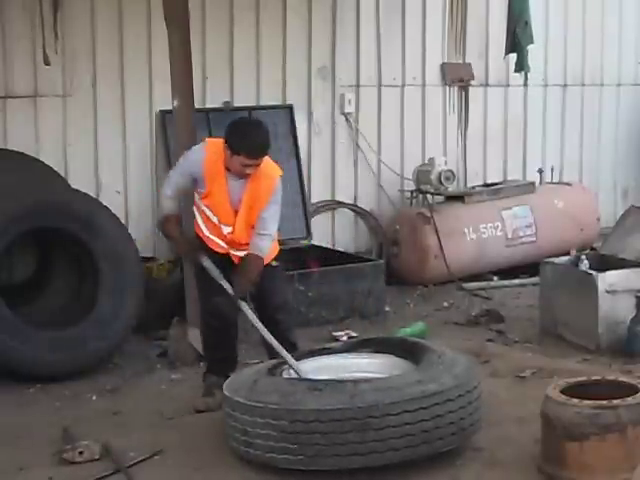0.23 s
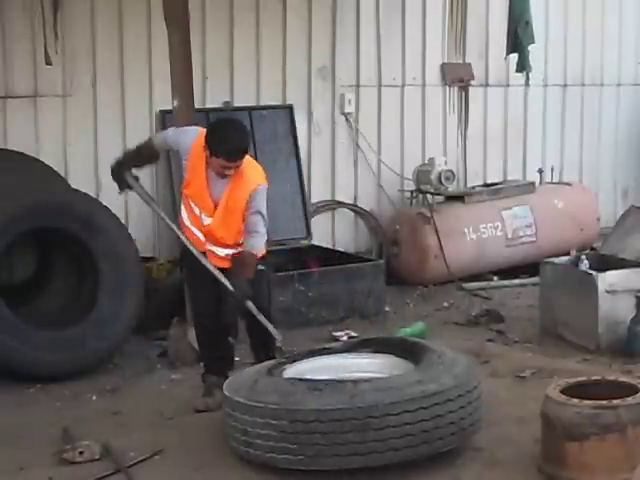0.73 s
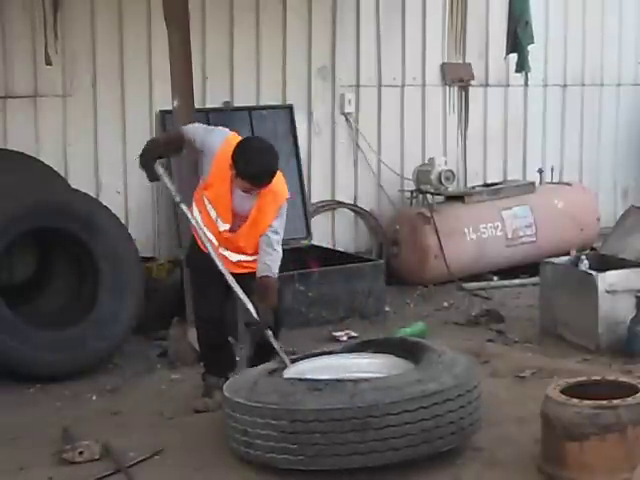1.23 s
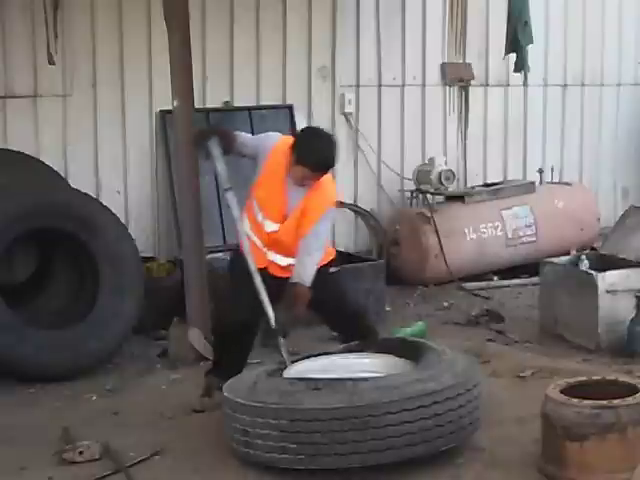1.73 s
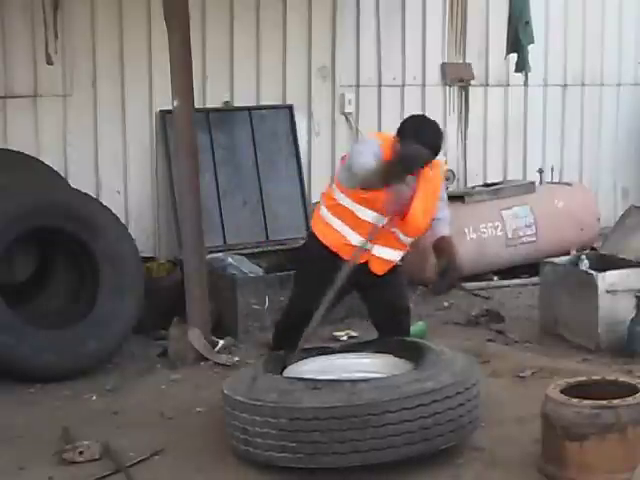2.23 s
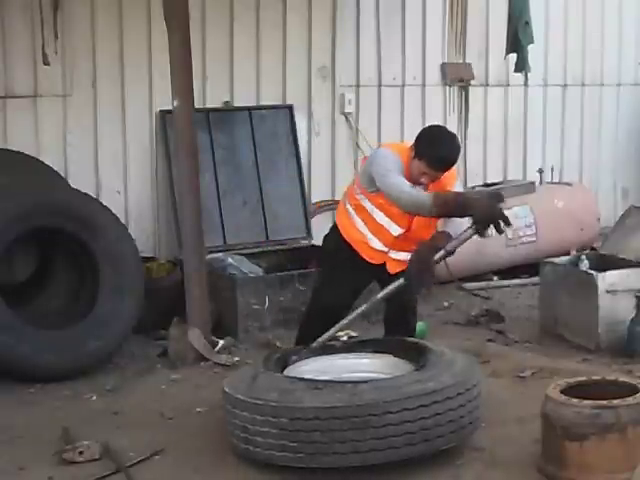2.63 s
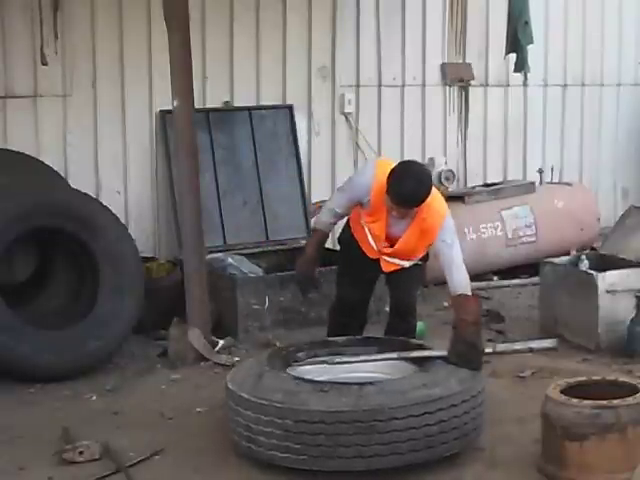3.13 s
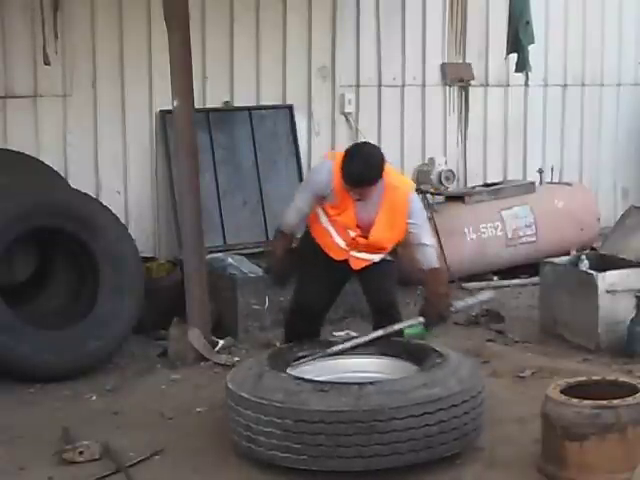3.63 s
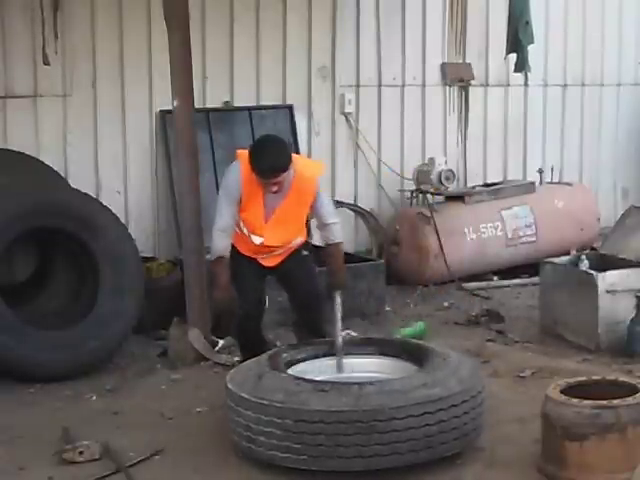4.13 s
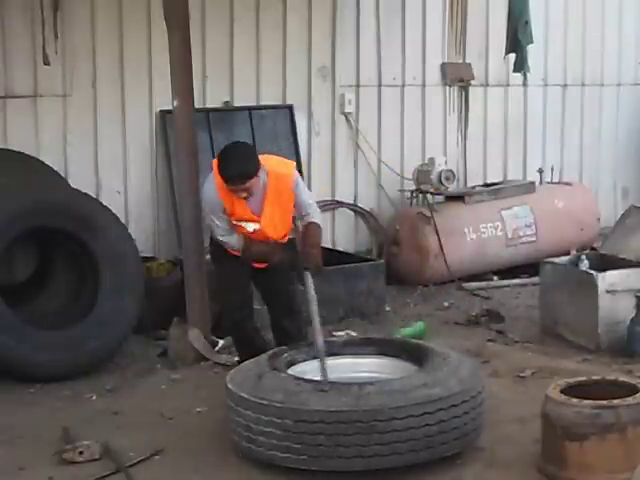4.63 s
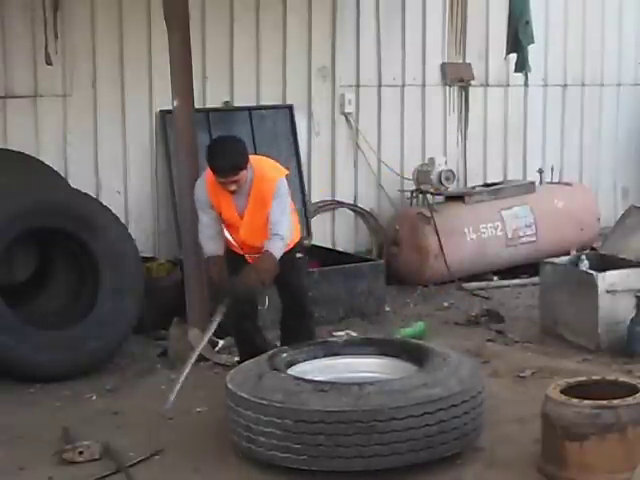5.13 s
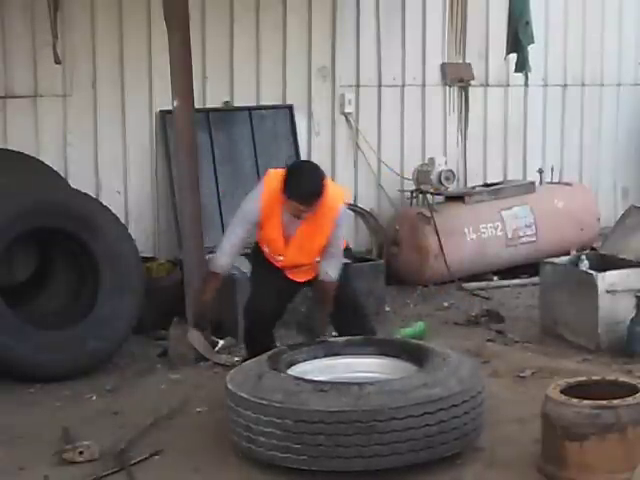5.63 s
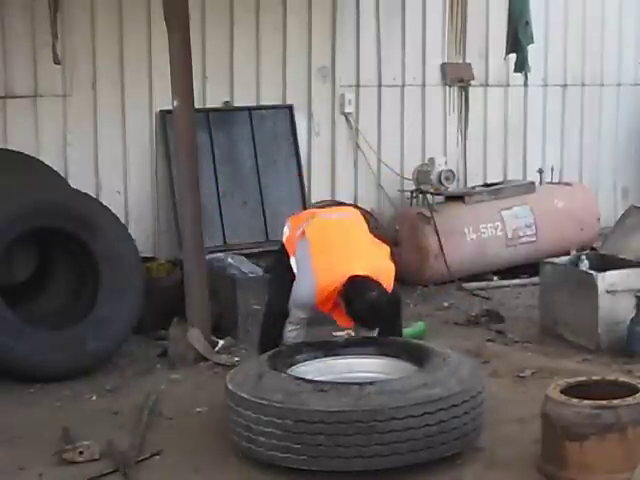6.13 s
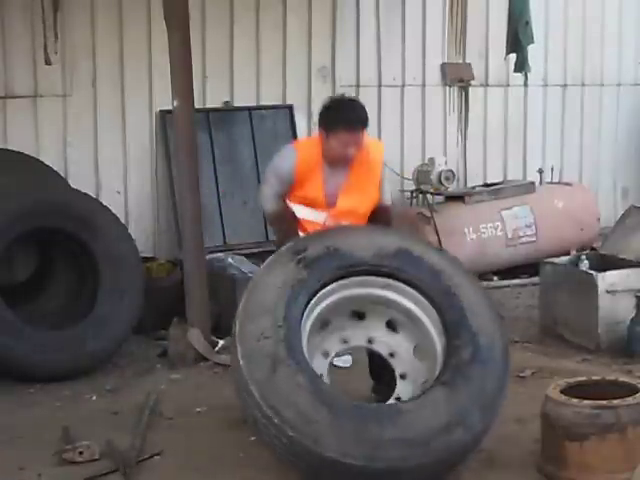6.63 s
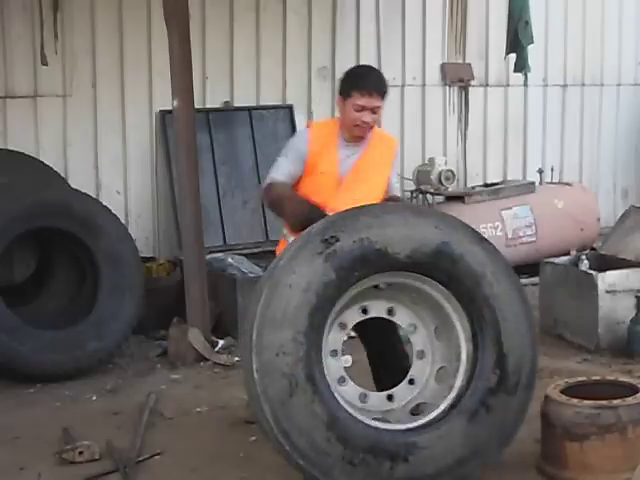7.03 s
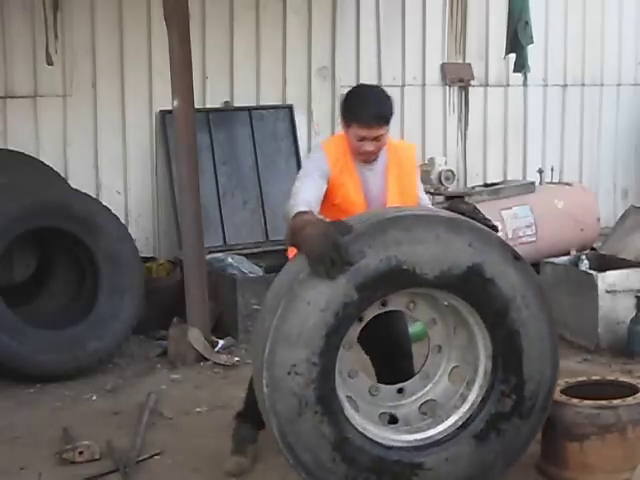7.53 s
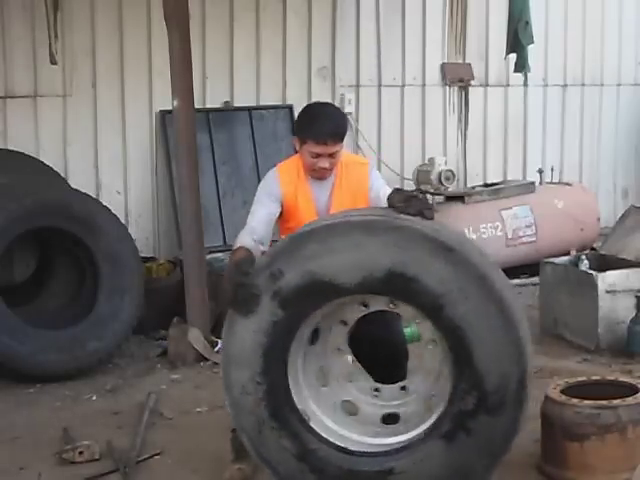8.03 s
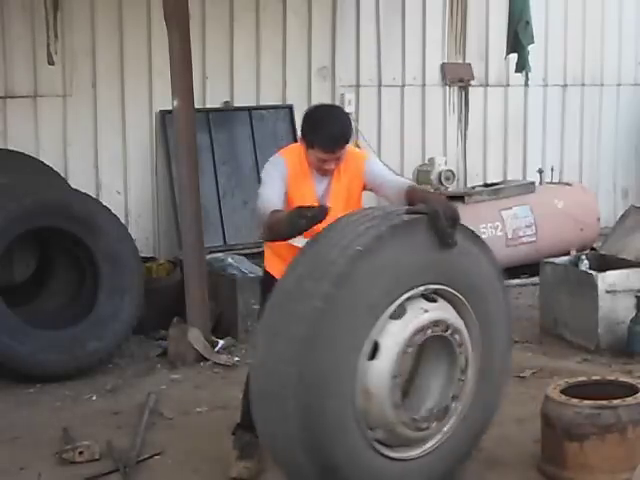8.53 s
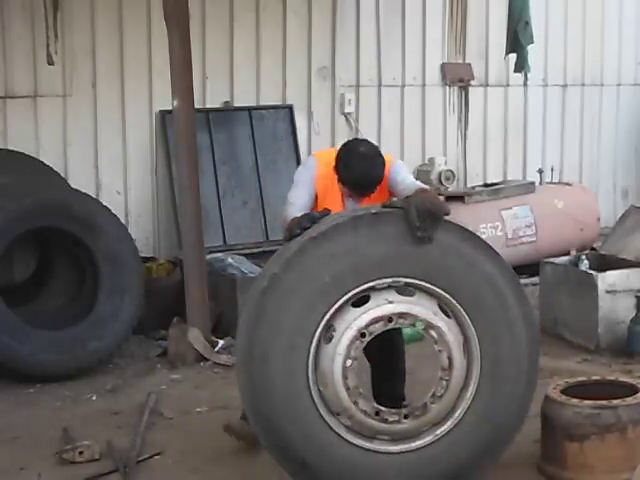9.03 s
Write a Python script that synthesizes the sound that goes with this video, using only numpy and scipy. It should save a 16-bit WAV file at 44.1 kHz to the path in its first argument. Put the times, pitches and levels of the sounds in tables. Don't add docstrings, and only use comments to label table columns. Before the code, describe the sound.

A steady low engine drone near 200 Hz, gently swelling, sits over soft road rumble throughout. At the very start an already ringing bar fades, then a bright clank strikes the rim at 0.07 s, followed by duller sliding knocks from 0.3 to 0.5 s. At 0.95 s a hard clang drives into the tyre with a deep hollow boom. Small ticks come at 1.45 and 1.65 s, a thump with clank at 2.9 s, and a lighter one at 3.9 s. From 5.1 s the thrown bar hits hard dirt, rattling rapidly and ringing; it lands loudest at 5.6 s, rebounds at 5.8 s and settles by 6.1 s. Only drone follows until rubber scuffs grit from 7.75 s, with a light ping at 7.9 s, roughest near 8.4 and 8.6 s, fading by 9 s. The nearby cheap microphone is dull and overloads on peaks.

```python
import sys
import numpy as np
from scipy import signal
from scipy.fft import rfft, irfft
from scipy.io import wavfile
from scipy.ndimage import uniform_filter1d

SR = 44100
rng = np.random.default_rng(int(sys.argv[2]) if len(sys.argv) > 2 else 0)


def magnitude_from_level(level_db):
    exponent = np.asarray(level_db, float) / 20
    return 10 ** exponent


def generate_wav(signal):
    frames = np.transpose(np.atleast_2d(signal))
    scaled = np.clip(frames, -1, 1) * 32767
    pcm = np.round(scaled).astype(np.int16)
    wavfile.write(sys.argv[1], SR, pcm)


N = 408807
T = np.arange(N) / SR


def curve(table):
    s, *columns = np.transpose(table)
    return [np.interp(T, s, column) for column in columns]


def coloured(spectrum):
    hz, db = np.transpose(spectrum)
    f = np.fft.rfftfreq(N, 1 / SR) + 1
    gain = magnitude_from_level(np.interp(np.log(f), np.log(hz), db))
    y = irfft(rfft(rng.standard_normal(N)) * gain, N)
    return y / y.std()


def walk(rate):
    k = int(SR / rate)
    levels = np.repeat(rng.standard_normal(N // k + 1), k)
    y = uniform_filter1d(uniform_filter1d(levels, k), k)[:N]
    return y / y.std()


def fade(t, t60):
    return np.exp(-np.log(1000) * t / np.maximum(t60, .01))


def gate(t, attack=.0008, release=.004):
    return (1 - np.exp(-(t - t[0]) / attack)) * (1 - np.exp((t - t[-1]) / release))


def add(out, s, sound):
    i = int(s * SR)
    out[i:i + len(sound)] += sound[:len(out) - i]


def bursts(events, rise_s):
    power = np.zeros((2, N))
    for s, db, held, t60, other_db in events:
        i = int(s * SR)
        t = T[:min(N - i, SR)]
        rise = 1 - np.exp(-t / max(rise_s, 1 / SR))
        shape = rise * fade(np.maximum(t - held, 0), t60)
        power[:, i:i + len(t)] += (magnitude_from_level(np.array([[db], [db + other_db]])) * shape) ** 2
    return np.sqrt(power)


def small_modes(noise, width_hz=30, depth_db=4.5):
    spec = rfft(noise)
    k = int(width_hz * N / SR)
    comb = uniform_filter1d(np.repeat(rng.standard_normal(len(spec) // k + 1), k), k)[:len(spec)]
    y = irfft(spec * magnitude_from_level(depth_db * comb / comb.std()), N)
    return y / y.std()


# pitch in Hz, level in dB.
CLATTER = [(820, -35), (1400, -8), (1820, -3.5), (2320, -6), (3290, -1), (3800, -11.5), (4960, -16.5),
           (5900, -29), (7670, -64), (13000, -120)]


def bright_clatter(chatter):
    return small_modes(coloured(CLATTER)) * chatter


# pitch in Hz, level in dB.
RIM_BODY = [(400, -28.5), (650, -0.5), (1050, 0), (1450, -3.5), (2100, -39)]
# start in seconds, clatter level in dB, seconds held, seconds to fade by 60 dB,
# level of the dull part in dB compared with the clatter.
KNOCKS = [(0, -17, 0.0017, 0.22, -6), (.071, -7.5, 0.02, 0.58, -2), (.314, -17, 0.01, 0.61, 6.5),
          (.326, -19, 0.013, 0.43, -0.5), (.365, -21, .02, 0.41, 8.5), (.409, -19.5, 0.008, 0.2, 4.5),
          (.445, -19.5, .006, 0.35, 7), (.949, -20, 0.013, 0.24, -13.5), (.972, -7, 0.013, 0.43, -10.5),
          (1.655, -19, 0.012, 0.37, -10.5), (2.954, -13, 0.0069, 0.25, -0.5),
          (3.936, -12.5, 0.0057, 0.2, -9.5), (5.144, -2, 0.021, 0.22, -3), (5.176, -10, .008, .15, -11),
          (5.195, -11, .004, 0.11, -8.5), (5.218, -7, .006, 0.14, -7.5), (5.238, -7.5, .004, 0.13, -5.5),
          (5.271, -8.5, 0.0049, 0.17, -10), (5.293, -9.5, 0.0045, .12, -6),
          (5.312, -12, 0.0066, 0.37, -6.5), (5.49, -25, .03, 0.27, -1), (5.614, 1.5, 0.054, 0.31, -6.5),
          (5.787, -20, .006, .2, -11.5), (5.795, -3, 0.026, 0.54, -11.5), (5.843, -5.5, 0.027, 0.25, -11.5),
          (5.91, -17.5, .01, 0.45, -7.5)]


def knocks():
    chatter = magnitude_from_level(1.85 * walk(120))
    bright_gain, dull_gain = magnitude_from_level(-7) * bursts(KNOCKS, rise_s=.0015)
    return bright_gain * bright_clatter(chatter) + dull_gain * coloured(RIM_BODY) * chatter


def ring(modes, start, end):
    t = T[int(start * SR):int((end + .004) * SR)]
    flicker_db, flicker_step_s = 2.5, .014
    steps = np.arange(t[0], t[-1] + flicker_step_s, flicker_step_s)
    out = 0
    for hz, *dbs in modes:
        db = np.interp(t, np.linspace(start, end, num=len(dbs)), dbs)
        db = db + flicker_db * np.interp(t, steps, rng.standard_normal(len(steps)))
        tone = np.sin(2 * np.pi * (hz * t + rng.random()))
        for size, spread_hz in [(.22, 50), (.18, 120)]:
            twin_hz = hz + spread_hz * (rng.random() - .5)
            tone = tone + size * np.sin(2 * np.pi * (twin_hz * t + rng.random()))
        out = out + magnitude_from_level(db) * tone
    attack = .004 if start else 1 / SR
    return np.sqrt(2) * gate(t, attack) * out


# pitch in Hz, then levels in dB at even steps from strike to end.
RING_LEFT_OVER = [(2713, -23, -26, -29), (3052, -15, -28, -29), (3391, -29, -35, -40),
                  (3725, -50, -46, -38), (4874, -47, -51, -68)]
RING_IN_BOWL = [(1152, -24, -17, -28, -40), (1340, -19, -25, -33, -39), (1658, -21, -31, -37, -42),
                (2175, -21, -33, -38, -45), (2482, -17, -40, -46, -57), (2643, -20, -36, -49, -46),
                (2837, -18, -35, -54, -56), (3047, -31, -21, -28, -51), (3381, -23, -33, -45, -54),
                (3505, -30, -35, -45, -47), (4107, -21, -44, -59, -59), (4380, -22, -46, -52, -60),
                (4786, -51, -40, -52, -52), (4893, -39, -43, -60, -65), (5250, -34, -50, -58, -64)]
RING_SLIDING = [(1077, -21, -33, -30), (1685, -12, -23, -33), (2175, -30, -24, -31), (2552, -23, -32, -54),
                (3042, -30, -27, -33), (3391, -29, -36, -33), (4237, -19, -47, -78), (4786, -38, -40, -47),
                (4888, -27, -37, -34)]
RING_BOWL_FLOOR = [(872, -14, -32, -32), (969, -8, -38, -35), (1055, -37, -29, -26), (1394, -25, -35, -32),
                   (1981, -21, -43, -40), (3042, -21, -42, -53)]
RING_IN_BEAD = [(861, -19, -27, -36, -40), (1330, -15, -32, -37, -39), (1464, -33, -31, -37, -36),
                (1567, -30, -28, -41, -45), (1879, -20, -32, -50, -53), (1960, -36, -33, -41, -41),
                (2379, -16, -25, -36, -62), (2670, -12, -27, -43, -44), (2740, -25, -28, -42, -56),
                (2821, -20, -24, -37, -44), (3359, -24, -38, -52, -61), (3478, -23, -37, -48, -65),
                (3876, -19, -38, -44, -63), (3962, -33, -41, -49, -46), (4560, -22, -42, -50, -60),
                (4990, -30, -42, -52, -60), (5276, -37, -39, -57, -62), (5490, -34, -43, -52, -60)]
RING_PRYING = [(2042, -33, -36, -52), (2355, -36, -36, -50), (2567, -29, -31, -38), (2659, -37, -36, -60),
               (3216, -29, -40, -46), (3386, -28, -42, -48)]
RING_ON_FLANGE = [(2705, -23, -37, -44), (3055, -32, -42, -51), (3369, -22, -40, -49),
                  (3520, -43, -50, -48), (4115, -23, -49, -62), (4723, -39, -50, -85)]
RING_LIFTED = [(2546, -17, -32, -48), (2610, -20, -36, -57), (2694, -35, -36, -64), (3052, -25, -38, -46),
               (3340, -27, -40, -52), (3512, -38, -40, -74), (4446, -38, -48, -70)]
# pitch in Hz, then levels in dB at even steps from strike to end.
RING_GRAZE = [(2551, -45, -35, -42), (2618, -38, -39, -52), (3044, -41, -42, -48), (3326, -36, -31, -54),
              (4360, -42, -45, -60), (5283, -47, -51, -62), (5741, -57, -58, -70)]
RING_TIP_DOWN = [(1723, -7, -34, -36, -33), (1873, -18, -25, -47, -47), (2180, -42, -26, -29, -41),
                 (2536, -8, -25, -15, -18), (2735, -22, -25, -30, -49), (2826, -24, -26, -40, -37),
                 (3047, -16, -30, -25, -26), (3327, -16, -13, -20, -17), (3580, -43, -22, -25, -35),
                 (3763, -18, -32, -29, -26), (4064, -29, -25, -41, -46), (4145, -26, -28, -37, -42),
                 (4360, -35, -34, -19, -25), (4624, -46, -33, -26, -32), (4786, -19, -30, -46, -43),
                 (4888, -24, -31, -33, -41), (5281, -60, -34, -39, -36)]
RING_AIRBORNE = [(1152, -21, -33, -42, -49), (1529, -35, -33, -36, -45), (1884, -42, -39, -40, -46),
                 (2196, -30, -30, -52, -50), (2541, -19, -21, -45, -46), (2837, -23, -18, -39, -50),
                 (2912, -35, -36, -36, -56), (3332, -13, -24, -34, -37), (3752, -24, -37, -41, -63),
                 (4064, -36, -30, -57, -58), (4404, -27, -29, -36, -49), (4748, -27, -40, -49, -64),
                 (4888, -26, -47, -57, -54), (5286, -41, -47, -47, -47), (5739, -49, -54, -51, -51)]
RING_FLAT = [(1152, -15, -20, -18, -20), (1680, -11, -36, -36, -35), (1750, -41, -28, -36, -40),
             (1873, -19, -14, -26, -38), (2169, -15, -16, -26, -36), (2552, -18, -17, -28, -37),
             (2616, -17, -15, -19, -31), (2842, -26, -16, -40, -37), (3052, -42, -23, -25, -32),
             (3219, -25, -23, -34, -43), (3332, -30, -17, -24, -34), (3537, -33, -19, -38, -36),
             (3768, -31, -26, -36, -52), (4145, -29, -21, -35, -41), (4237, -25, -30, -49, -61),
             (4414, -33, -29, -36, -39), (4775, -28, -25, -38, -42), (4893, -20, -29, -37, -45),
             (5281, -16, -40, -47, -51), (5739, -26, -47, -59, -60)]
RING_REBOUND = [(1152, -22, -20), (1653, -14, -22), (2175, -19, -16), (2541, -15, -26), (2600, -19, -27),
                (2821, -22, -21), (3068, -13, -28), (3219, -29, -26), (3327, -23, -23), (3526, -25, -22),
                (4404, -26, -27), (4775, -31, -32), (4872, -36, -33)]
RING_SETTLING = [(1152, -23, -22, -31, -30), (1707, -21, -42, -45, -42), (1879, -23, -34, -48, -52),
                 (2180, -20, -24, -43, -40), (2562, -32, -26, -31, -39), (2622, -19, -22, -39, -63),
                 (2837, -20, -30, -42, -46), (2907, -43, -28, -34, -56), (3036, -31, -27, -56, -53),
                 (3327, -12, -18, -29, -45), (3521, -16, -27, -44, -63), (3763, -41, -34, -42, -43),
                 (4107, -26, -29, -47, -51), (4355, -31, -31, -45, -49), (4630, -26, -33, -52, -60),
                 (4770, -23, -42, -57, -58), (5292, -46, -33, -46, -63), (5728, -48, -39, -53, -71)]
# start in seconds, end in seconds, ringing tones, ring level in dB, crack level in dB.
RINGS = [(0, 0.064, RING_LEFT_OVER, 1.5, -39), (0.067, 0.325, RING_IN_BOWL, -2, -8),
         (0.321, 0.406, RING_SLIDING, 0, -20), (0.403, 0.513, RING_BOWL_FLOOR, 0, -19),
         (0.969, 1.129, RING_IN_BEAD, 2, -3), (1.652, 1.734, RING_PRYING, 0.5, -20),
         (2.953, 3.057, RING_ON_FLANGE, -0.5, -19.5), (3.935, 4.033, RING_LIFTED, -1.5, -26),
         (5.141, 5.268, RING_TIP_DOWN, 0, -10), (5.263, 5.47, RING_AIRBORNE, 0, -18),
         (5.467, 5.615, RING_GRAZE, -0.5, -45), (5.611, 5.792, RING_FLAT, 1.5, -6.5),
         (5.791, 5.843, RING_REBOUND, -1, -14.5), (5.834, 6.066, RING_SETTLING, -0.5, -25.5)]
# (pitch in Hz, levels in dB from early to late).
LONG_RINGS = [
    (5.488, 5.562, [(1698, -24, -24, -30)]),
    (.948, .972, [(2186, -28, -27), (3068, -31, -27), (3420, -26, -38), (4296, -30, -34), (4620, -33, -38)]),
    (1.44, 1.49, [(4050, -38, -50), (2740, -34, -42)]),
    (6.068, 6.16, [(1152, -34, -44), (2562, -42, -54), (3327, -43, -54), (5292, -60, -70)]),
]


def ringing():
    out, t = np.zeros(N), T[:SR // 5]
    crack = coloured([(300, -30.0), (700, 1.0), (3500, -5.0), (5800, -19)])
    for start, end, modes, ring_db, crack_db in RINGS:
        i = int(start * SR)
        add(out, start, magnitude_from_level(ring_db) * ring(modes, start, end))
        snap = gate(t) * fade(t, t60=0.1) * crack[i:i + len(t)]
        add(out, start, magnitude_from_level(crack_db) * snap)
    for start, end, modes in LONG_RINGS:
        add(out, start, ring(modes, start, end))
    return out


# time in seconds, level of the firing tone in dB.
LOAD = [(0, -18), (.5, -22), (1.0, -19.5), (1.9, -22.5), (2.2, -18), (2.9, -23.5), (3.25, -14),
        (3.7, -25.5), (4.0, -18.5), (4.4, -22), (5.5, -21), (6.2, -20), (7.3, -25.5), (7.8, -21),
        (8.5, -23), (9.27, -21)]
# pitch in Hz, level in dB.
DRONE_SIDES = [(64, -27), (103, -26.5), (155, -29.5), (287, -33.5)]


def engine():
    firing_hz, swell_db, swells_per_s = 205.3, 1.6, 4
    db = curve(LOAD)[0] + swell_db * walk(swells_per_s)
    out = magnitude_from_level(db + 1.4 * walk(6.8)) * np.sin(2 * np.pi * firing_hz * T + 0.18 * walk(10))
    for side_hz, side_db in DRONE_SIDES:
        side = np.sin(2 * np.pi * side_hz * T + 0.94 * walk(4))
        out = out + magnitude_from_level(side_db + 2.2 * walk(5.7)) * side
    return np.sqrt(2) * out


# pitch in Hz, level in dB.
ROAD = [(10, -32.5), (18, -12), (32, -7.5), (64, -4.5), (150, -6.5), (240, -9.5), (484, -11.5),
        (1080, -18.5), (1460, -26.5), (2200, -31), (3320, -35), (4590, -44.5), (5300, -50.5), (6000, -56.5),
        (7000, -89)]


def road():
    spec = rfft(coloured(ROAD))
    f = np.fft.rfftfreq(N, 1 / SR) + 1
    out = 0
    for hz in 22 * 2. ** np.arange(9):
        octaves_off = np.log2(np.clip(f, 22, 5632) / hz)
        share = np.clip(1 - abs(octaves_off), 0, 1)
        swell = magnitude_from_level(0.9 * walk(1.673) + 0.67 * walk(11))
        out = out + swell * irfft(spec * share, N)
    return magnitude_from_level(-14.5) * out


# start in seconds, peak in dB, pitch in Hz, seconds to fade by 60 dB.
TICKS = [
    (.249, -22, 4300, .12),
    (1.437, -11.5, 3450, 0.13),
    (1.657, -15, 4560, .1),
    (2.918, -15.5, 3190, 0.14),
    (7.919, -18, 3080, 0.14),
]


def ticks():
    out, t = np.zeros(N), T[:SR // 5]
    bright = bright_clatter(magnitude_from_level(1.85 * walk(120)))
    for s, peak_db, hz, t60 in TICKS:
        i = int(s * SR)
        ping = np.sin(2 * np.pi * hz * t) * fade(t, .5 * t60)
        puff = fade(t, t60) * bright[i:i + len(t)]
        add(out, s, magnitude_from_level(peak_db - 13.0) * gate(t) * (1.6 * ping + puff))
    return out


# pitch in Hz, level in dB.
CARCASS = [(52, -1), (122, 0), (172, 0), (245, -12.5)]
# start in seconds, peak in dB, seconds to fade by 60 dB.
THUMPS = [
    (0.944, 0.5, 0.26),
    (0.961, -0.5, 0.27),
    (0.981, 4, 0.31),
    (1.01, 0, 0.16),
    (2.914, 1.5, 0.31),
    (2.958, -1, 0.35),
    (3.932, -3, .12),
    (5.075, -5, 0.45),
]


def tyre_thumps():
    out, t = np.zeros(N), T[:SR // 2]
    boom = sum(magnitude_from_level(db) * np.sin(2 * np.pi * hz * t) for hz, db in CARCASS)
    for s, peak_db, t60 in THUMPS:
        add(out, s, magnitude_from_level(peak_db - 8.0) * (1 - np.exp(-t / 0.0097)) * fade(t, t60) * boom)
    return out


# start in seconds, level in dB, seconds held, seconds to fade by 60 dB,
# treble in dB compared with the level.
SCUFFS = [
    (7.755, -30.5, .02, 0.4, -6.5),
    (7.9, -26.5, 0.31, 0.87, -8.5),
    (8.21, -27.5, 0.013, 0.75, -3.5),
    (8.388, -15, 0.016, 0.55, -12),
    (8.44, -27, 0.028, 0.28, -16),
    (8.59, -19.5, 0.022, 0.2, -9.5),
    (8.82, -31, 0.037, 0.33, -9),
]


def tyre_scuffs():
    low_gain, high_gain = bursts(SCUFFS, rise_s=0.0079)
    low = coloured([(400, -34.5), (750, 0), (1050, 3.5), (1450, -2.5), (2200, -30.0)])
    high = coloured([(1200, -42.5), (1900, 9.5), (3100, 2.5), (4500, -4.5), (6000, -25.0)])
    roughness = magnitude_from_level(1.5 * walk(60) + 0.79 * walk(300))
    return roughness * (low_gain * low + high_gain * high)


def scene():
    iron = knocks() + ringing() + ticks()
    tyre = tyre_thumps() + tyre_scuffs()
    return (iron + engine() + road() + tyre)[None]


def low_pass(x):
    return signal.sosfilt(signal.butter(12, 15810, fs=SR, output="sos"), x)


def record(dry):
    top_hz, overload, offset = 6750, .715, .008
    cut = signal.cheby2(8, 40, top_hz, fs=SR, output="sos")
    dull = signal.sosfiltfilt(cut, np.clip(dry, -.8, .8))
    mix = np.clip(dull, -overload, overload) + offset
    return low_pass(mix)


dry = scene()
out = record(dry)
generate_wav(out)
```